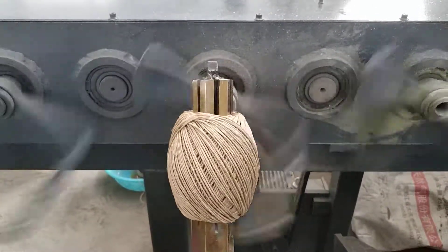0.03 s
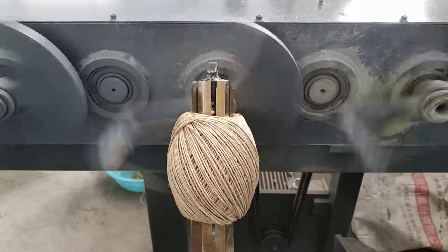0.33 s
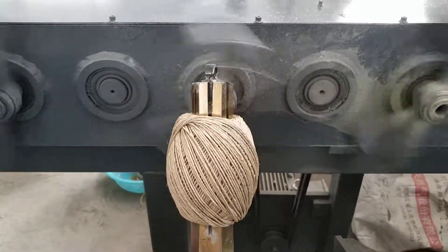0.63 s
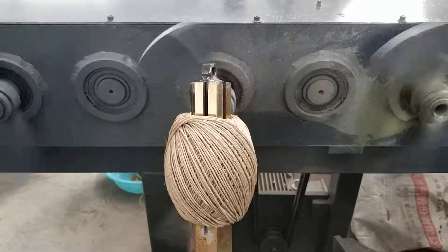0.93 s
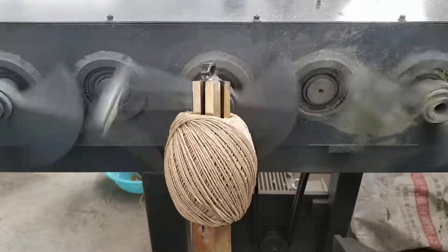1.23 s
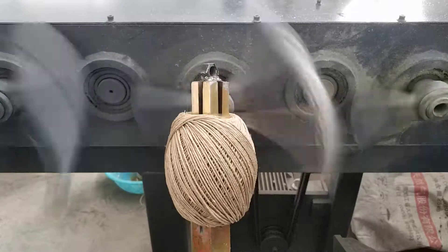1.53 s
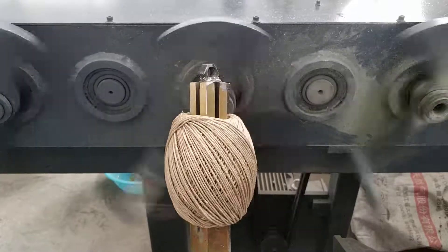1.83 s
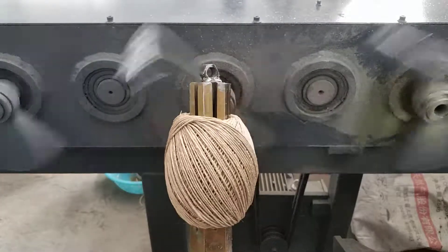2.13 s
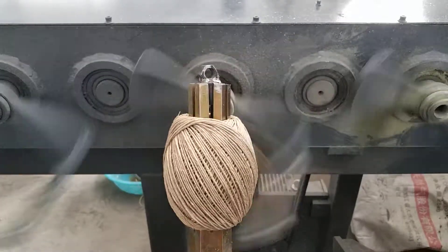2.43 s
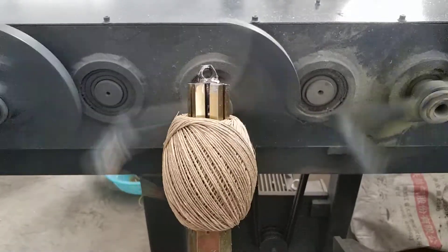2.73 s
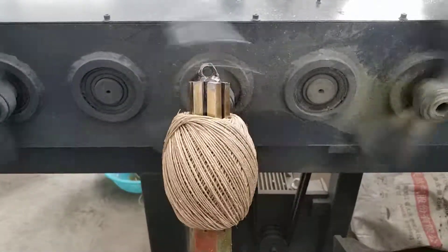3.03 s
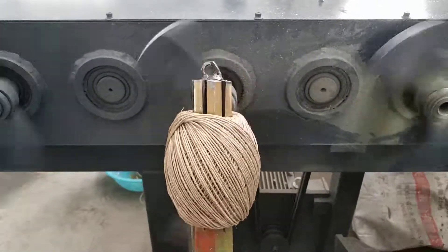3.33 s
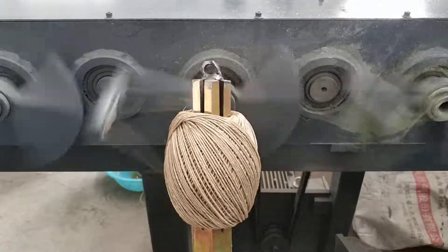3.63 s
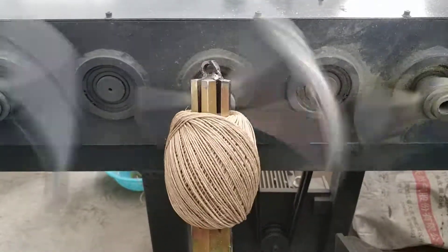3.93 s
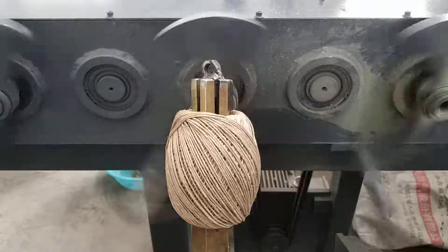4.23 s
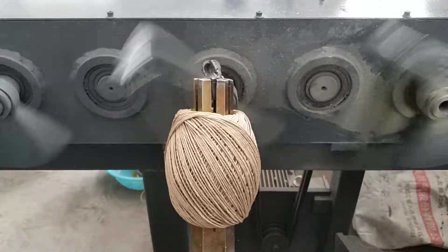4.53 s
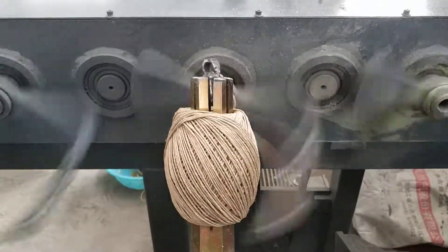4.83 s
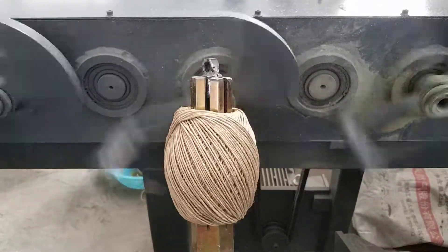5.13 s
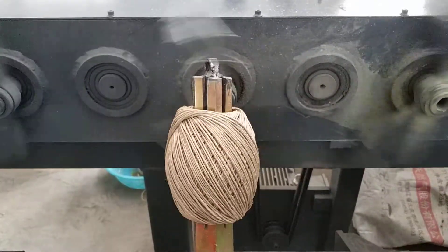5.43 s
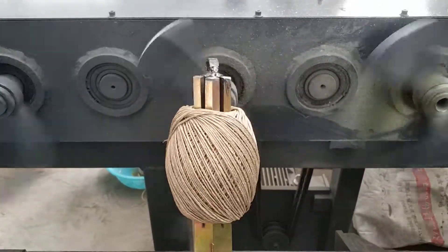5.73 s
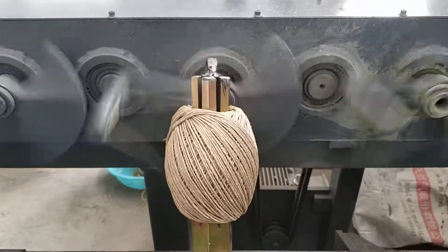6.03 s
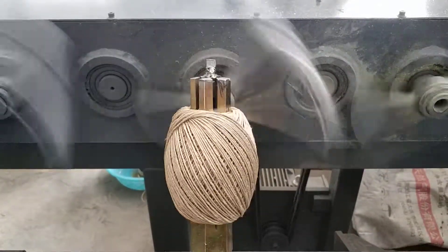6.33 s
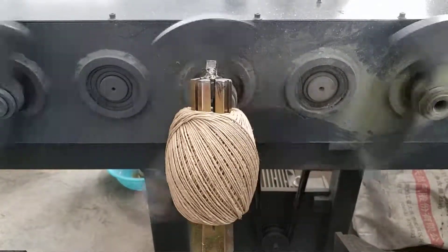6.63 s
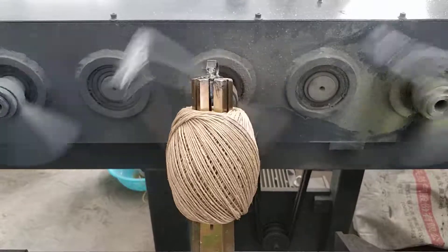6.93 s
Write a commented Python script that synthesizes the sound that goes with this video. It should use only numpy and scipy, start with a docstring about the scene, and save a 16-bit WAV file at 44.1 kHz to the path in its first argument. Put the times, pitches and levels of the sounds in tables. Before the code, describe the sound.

A yarn winding machine runs steadily for the whole seven seconds, heard close up in a workshop with only weak echo. The main sound is a dense midrange whir and chatter of loose gears ringing a steel frame, pulsing about eight times a second and slightly uneven in strength. Underneath, the drive drones and bumps. Small metal parts rattle with each turn, and the bearings add a fine hiss with a faint, thin high ring.

Slightly harder knocks and clacks are scattered throughout, for example around 0.5, 1.2, 3.2, 4.8 and 5.9 seconds. Dull thumps come at about 2.6 and 3.2 seconds, with a cluster between 6.4 and 6.9 seconds. The rattle and hiss dip very briefly near 2.8 and 6.9 seconds. The speed and overall loudness stay constant, and the machine is still running at the end.

```python
"""Yarn ball winder, close up

A workshop, one microphone close to a winder whose flyers turn about eight times a second. In every
turn loose gear teeth chatter and ring the steel frame, the drive bumps over its own drone and small
metal parts rattle; a slower belt loads gears and parts unevenly. Now and then a blow lands harder.
Behind it all, bearings hiss with a faint thin ring and the room answers weakly."""
import sys
import numpy as np
from scipy import signal
from scipy.fft import rfft, irfft, next_fast_len
from scipy.io import wavfile
from scipy.ndimage import uniform_filter1d, minimum_filter1d

SR = 44100
rng = np.random.default_rng(int(sys.argv[2]) if len(sys.argv) > 2 else 0)


def store_wav(level_fs):
    """Save 16-bit WAV to argv[1]."""
    pcm = np.round(np.clip(np.atleast_2d(level_fs), -1, 1) * 32767)
    wavfile.write(sys.argv[1], SR, pcm.T.astype(np.int16))


N = 312669
TIME = np.arange(N) / SR
FLYER_HZ, BELT_HZ, TEETH_PER_TURN = 7.915, 2.754, 52


# Teeth falling through their play in each turn: phase/turns, level/dB, length/s, hardness/dB
GEAR_CHATTER = [(.05, 6.5, 0.027, 0.5), (.33, 4, 0.02, -1), (.66, 6, .019, 2.1), (.79, 4, 0.017, 3.5)]
# Hardest knocks of the gears: t/s, level/dB, length/s, hardness/dB
GEAR_KNOCKS = [(0.094, 7, 0.053, -0.5), (0.141, 12.5, 0.013, 2.5), (0.259, 11.5, .019, -.5),
               (0.35, 9.5, 0.015, 4.5), (0.46, 13.5, 0.013, 0), (0.641, 8.5, 0.03, -1.5),
               (0.776, 8, 0.019, 6.5), (0.843, 5, .022, 6), (0.889, 9, 0.021, -3), (0.985, 8.5, 0.033, 1.5),
               (1.207, 7.5, 0.043, 0.5), (1.489, 11.5, 0.03, -2), (1.545, 5, 0.027, -2.5),
               (1.641, 9, 0.041, -1), (1.877, 8.5, .045, 0.5), (1.987, 8.5, 0.017, -1),
               (2.262, 10, 0.021, 1.5), (2.508, 8, 0.031, 4.5), (2.914, 9, .04, 1),
               (3.022, 10.5, 0.016, 1.5), (3.25, 13, 0.016, 2), (3.685, 8, 0.035, -1.5),
               (3.783, 10.5, 0.023, -0.5), (3.983, 7.5, 0.036, 4), (4.515, 8, .04, 1.5),
               (4.648, 8, .045, 1.5), (4.692, 13.5, 0.01, 4.5), (4.809, 15, .014, -2),
               (4.871, 9, 0.023, -4), (5.186, 12, 0.013, -1), (5.434, 9.5, 0.027, 0.5),
               (5.526, 11.5, 0.018, -5), (5.649, 11, 0.023, -0.5), (5.91, 13.5, .016, 5),
               (6.175, 10, .015, 2), (6.274, 8.5, .028, -0.5), (6.57, 9, 0.032, -0.5),
               (6.673, 15, 0.011, 0.5), (6.77, 11.5, 0.012, -3), (6.915, 12.5, .007, -3),
               (6.968, 11.5, .014, 0), (7.049, 10.5, 0.013, 1)]
# Broad response of the steel frame: f/Hz, level/dB
FRAME_RESPONSE = [(30, -69), (150, -38), (300, -17.5), (480, -3.5), (620, 2), (750, 0.5), (885, -6.5),
                  (970, 2.5), (1230, -1.5), (1350, -3.5), (1750, -1), (2300, -5), (2900, -11.5),
                  (10000, -39)]
# Ringing modes of the frame: f/Hz, width/Hz, lift/dB
FRAME_RESONANCES = [(540, 29.6, 10), (676.5, 27, 11.5), (767, 65, 7), (801.3, 26, 5), (848, 14, 7),
                    (1079, 28.4, 7.5), (1143, 16, 7.5), (1261, 75, 3), (1240, 25, 0), (1473, 30, 8.5),
                    (1608, 22, 10), (1637, 20, 8), (1942, 27, 8), (2430, 78, 4.5)]
def gears(spill=0.11):
    """Teeth and their rebounds ring the frame: soft bursts near 800 Hz, hard ones near 1200 Hz."""
    mesh = teeth(slop=.27, spread_db=1)
    rebounds = ticks(per_s=4500, spread_db=3.5)
    blows = .85 * mesh + .65 * rebounds
    bursts = every_turn(GEAR_CHATTER, GEAR_KNOCKS, scatter_s=.009, spread_db=3) + GEAR_KNOCKS
    # each burst's force beyond that of steady running
    soft = force([(s, db - hardness, length) for s, db, length, hardness in bursts], steady_db=-2) - 1
    hard = force([(s, db + hardness, length) for s, db, length, hardness in bursts], steady_db=-2) - 1
    knocks = band(blows * soft, 720, 950) + band(blows * hard, 950, 1340) + spill * blows * hard
    steady = blows + .3 * clinks(t60=.06, spread_db=10)
    loaded = (steady + knocks + panels(steady)) * belt(depth=.82)
    return amp(-15) * unit_rms(resonate(loaded, FRAME_RESPONSE, FRAME_RESONANCES))


def teeth(slop, spread_db):
    """One impact a tooth; the flyers' imbalance and the play in the gears shift each early or late."""
    turns = FLYER_HZ * TIME
    imbalance = .2 * np.sin(2 * np.pi * turns)
    teeth_passed = turns * TEETH_PER_TURN + imbalance + slop * drift(hz=20) + .02 * drift(hz=404)
    hits = np.diff(np.floor(np.maximum.accumulate(teeth_passed)), prepend=0) > 0
    return unit_rms(hits * amp(spread_db * np.clip(rng.standard_normal(N), -2, 2)))


# Panels of the frame: low f/Hz, high f/Hz, swing/dB, level/dB
FRAME_PANELS = [(450, 597, 5.5, 3.5), (1500, 1640, 5, -2), (1680, 2630, 3, -3)]
def panels(blows):
    """Each panel takes up the blows more or less strongly from moment to moment."""
    change = np.zeros(N)
    for low_hz, high_hz, swing_db, db in FRAME_PANELS:
        uptake = amp(db + swing_db * np.clip(drift(hz=20), -2, 1.7))
        change += band(blows * (uptake - 1), low_hz, high_hz)
    return change


# Load over one lap of the belt: phase/laps, level/dB at depth 1
BELT_LAP = [(.05, -0.25), (.25, 0.46), (.35, 0.5), (.45, 1.65), (.6, -1), (.7, 1.34), (.85, -1), (.95, 0.1)]
def belt(depth):
    """Gain from the belt's uneven load, the same in every lap."""
    return amp(depth * np.interp(BELT_HZ * TIME, *np.transpose(BELT_LAP), period=1))


# Bumps from the flyers' imbalance in each turn: phase/turns, level/dB, length/s
FLYER_BUMPS = [(.22, -2.5, 0.012), (.5, 1.5, 0.075)]
# Heaviest thumps of the drive: t/s, level/dB
DRIVE_THUMPS = [(.05, 4.5), (.392, 5.5), (1.076, 4), (1.541, 2.5), (2.64, 11), (2.988, 5), (3.187, 8.5),
                (4.469, 7), (5.239, 6.5), (6.399, 9), (6.51, 8), (6.61, 8.5), (6.888, 10)]
# Broad response of the stand: f/Hz, level/dB
STAND_RESPONSE = [(30, -75), (60, -50.5), (100, -35), (140, -20.5), (190, -5.5), (240, -7.5), (400, -1),
                  (480, -7.5), (620, -4.5), (900, -1.5), (2000, -13), (5000, -59.5)]
# Ringing modes of the stand: f/Hz, width/Hz, lift/dB (sign ignored)
STAND_RESONANCES = [(210.4, 13.3, 6), (240, 28, 11), (293, 34, 7), (367, 27, 8.5), (405, 7.3, -6)]
def drive(thump_s=.028):
    """Under the gears, the drive rumbles unevenly and bumps in the stand."""
    bumps = every_turn(FLYER_BUMPS, DRIVE_THUMPS, scatter_s=.019, spread_db=2.5)
    thumps = [(s, db, thump_s) for s, db in DRIVE_THUMPS]
    drone = ticks(per_s=1600, spread_db=1.5)
    blows = drone * force(bumps + thumps, steady_db=2.5) * amp(1.67 * drift(hz=22))
    return amp(-21.5) * unit_rms(resonate(blows, STAND_RESPONSE, STAND_RESONANCES))


# Broad response of the small parts: f/Hz, level/dB
PARTS_RESPONSE = [(200, -40.5), (1200, 7), (2200, -1.5), (2900, -6), (3700, 3.5), (4200, 1.5), (4700, -5),
                  (5200, -9), (7200, -22), (9500, -11), (10500, -31)]
# Ringing modes of the small parts: f/Hz, width/Hz, lift/dB
PARTS_RESONANCES = [(3225, 70, 2.5), (3475, 50, 3), (3940, 80, 4.5), (4625, 50, 2.5), (5475, 70, 4),
                    (5855, 45, 4)]
def loose_parts(shake):
    """Small metal parts buzz and clink as they are shaken."""
    grit = ticks(per_s=4000, spread_db=2.5) + .8 * clinks(t60=.07, spread_db=9)
    return amp(-24.5) * unit_rms(resonate(grit * shake, PARTS_RESPONSE, PARTS_RESONANCES))


# Shakes of the small parts in each turn: phase/turns, level/dB, length/s
PARTS_RATTLE = [(.19, -2.5, 0.017), (.35, 0, 0.027), (.69, -3, 0.032), (.99, -3, 0.029)]
# Loudest clacks of the small parts: t/s, level/dB, length/s
PARTS_CLACKS = [(0.176, 3, 0.065), (0.419, 5, 0.021), (0.868, 2.5, 0.034), (1.18, 9.5, 0.024),
                (2.319, 6.5, 0.032), (2.428, 4.5, .027), (2.693, 4.5, 0.038), (3.074, 6.5, .022),
                (3.45, 4.5, 0.035), (3.827, 4.5, 0.041), (4.086, 7, 0.018), (4.206, 7, 0.02),
                (4.463, 3.5, 0.022), (4.58, 4.5, 0.023), (4.961, 5.5, .022), (5.088, 6.5, .018),
                (5.161, 2.5, .02), (5.245, 3, 0.045), (5.606, 3.5, 0.034), (5.869, 3, 0.022),
                (5.985, 4, 0.032), (6.214, 3.5, .04), (6.333, 5.5, .034), (6.601, 3, .026),
                (6.735, 3.5, 0.015)]
def shaking():
    """Force on the small parts: pulsing in each turn, more when the belt pulls, most in a clack."""
    rattles = every_turn(PARTS_RATTLE, PARTS_CLACKS, scatter_s=.0058, spread_db=3)
    routine = force(rattles, steady_db=-6.5) * belt(depth=1.6)
    return np.hypot(routine, force(PARTS_CLACKS, steady_db=-21))


# Broad response of the bearings: f/Hz, level/dB
BEARING_RESPONSE = [(300, -40), (2000, 5.5), (3500, 5.5), (5200, -0.5), (6000, 2), (7200, -2), (8600, -1),
                    (9700, -4), (10150, -8.5), (10500, -24)]
# Thin ring of the bearings: f/Hz, relative level/dB
BEARING_TONES = [(7236, -59), (7595, -52.5), (7753, -53), (8030, -55.5), (8389, -61.5), (8461, -48.5),
                 (8678, -52)]
def bearings(shake, shake_share=.47, waver_db=.2):
    """Bearings give a fine gritty hiss that swells with each rattle, and thin wavering tones."""
    swell = unit_rms(shake ** shake_share * amp(waver_db * drift(hz=10)))
    grit = ticks(per_s=7000, spread_db=3.5) + .75 * clinks(t60=.07, spread_db=10)
    hiss = unit_rms(resonate(grit, BEARING_RESPONSE))
    tones = sum(amp(db + 2.5 * drift(hz=7)) * np.sin(2 * np.pi * hz * TIME + .7 * drift(hz=4))
                for hz, db in BEARING_TONES)
    return amp(-29) * swell * hiss + amp(4) * tones


# Slow swell of rattle and hiss: t/s, level/dB
TREBLE_SWELL = [(0, 0.5), (.7, -1.2), (2, -0.2), (3.6, 0.86), (5.2, 0.44), (6.2, .3), (7.09, 0.8)]
# Brief lulls in rattle and hiss: t/s, level/dB, length/s
TREBLE_LULLS = [(2.12, -4, 0.021), (2.847, -6, 0.058), (3.933, -3, 0.061), (6.523, -3, 0.028),
                (6.87, -4, 0.11)]
def treble():
    """Gain of rattle and hiss together: they swell slightly and now and then dip briefly."""
    dips = sum(db * bell(TIME - s, length) for s, db, length in TREBLE_LULLS)
    return amp(np.interp(TIME, *np.transpose(TREBLE_SWELL)) + dips)


def workshop(x, t60=.17, wet_db=-17):
    """Dense reflections from the walls and the other machines, weak this close to the winder."""
    t = TIME[:SR // 2]
    tail = rng.standard_normal(len(t)) * amp(-60 * t / t60) * (t > .005)
    return x + amp(wet_db) * signal.oaconvolve(x, tail / np.linalg.norm(tail))[:N]


def every_turn(pattern, accents, scatter_s, spread_db, clear_s=.028):
    """Repeats bursts each flyer turn, uneven in time and strength, leaving gaps for the accents."""
    turns = range(int(TIME[-1] * FLYER_HZ) + 1)
    bursts = np.array([((turn + phase) / FLYER_HZ, *rest) for turn in turns for phase, *rest in pattern])
    late, strong = np.clip(rng.standard_normal((len(bursts), 2)), -2, 1.2).T
    bursts[:, 0] += scatter_s * late
    bursts[:, 1] += spread_db * strong
    return [burst for burst in bursts if min(abs(burst[0] - s) for s, *_ in accents) > clear_s]


def force(bursts, steady_db):
    """Strength of contact: a steady part plus bursts (t/s, level/dB, length/s), added in power."""
    power = np.full(N, amp(steady_db) ** 2)
    for s, db, length in bursts:
        near = slice(*np.searchsorted(TIME, [s - 2 * length, s + 2 * length]))
        power[near] += amp(db) ** 2 * bell(TIME[near] - s, length)
    return np.sqrt(power)


def ticks(per_s, spread_db):
    """Tiny impacts at random moments, of random sign and size."""
    hits = rng.random(N) < per_s / SR
    size = amp(spread_db * np.clip(rng.standard_normal(N), -2, 2))
    return unit_rms(hits * size * rng.choice([-1, 1], N))


def clinks(t60, spread_db, count=6500):
    """Many small pieces of metal, struck at random, each ringing briefly at its own pitch."""
    t = TIME[:SR // 20]
    out, decay = np.zeros(N + len(t)), amp(-60 * t / t60)
    for when, pitch, size in rng.random((count, 3)):
        at, hz = int(when * N), 1500 + 9000 * pitch
        out[at:at + len(t)] += amp(spread_db * size) * decay * np.sin(2 * np.pi * hz * t)
    return unit_rms(out[:N])


def resonate(x, broad, modes=(), size=8192):
    """Passes x through a body with a broad response and modes that ring on after each blow."""
    hz = np.fft.rfftfreq(size, 1 / SR)
    broad_hz, broad_db = np.transpose(broad)
    gain = amp(np.interp(np.log(hz + 1), np.log(broad_hz), broad_db))
    power_lift = 1
    for centre, width, db in modes:
        detuning = 2 * (hz - centre) / (width * np.pi / 2)
        power_lift += (amp(abs(db)) ** 2 - 1) / (1 + detuning ** 2) ** 2
    log_gain = np.log(gain * np.sqrt(power_lift))
    mirrored = np.concatenate([log_gain, log_gain[-2:0:-1]])
    spectrum = np.exp(np.conj(signal.hilbert(mirrored)))  # minimum phase: no sound before the blow
    return signal.oaconvolve(x, np.fft.ifft(spectrum).real[:size // 2])[:N]


def drift(hz, step=16):
    """Smooth random wander of rms 1, rolling off above hz."""
    size = next_fast_len(N // step + 2)
    f = np.fft.rfftfreq(size, step / SR)
    slow = irfft(rfft(rng.standard_normal(size)) / (1 + (f / hz) ** 4), size)
    return unit_rms(np.interp(np.arange(N) / step, np.arange(size), slow))


def band(x, low_hz, high_hz):
    """Keeps one band without delaying it."""
    return signal.sosfiltfilt(signal.butter(3, [low_hz, high_hz], "band", fs=SR, output="sos"), x)


def bell(t, width):
    """Bell curve with the given width at half height."""
    return .5 ** ((2 * t / width) ** 2)


def amp(db):
    """Decibels to gain."""
    return 10 ** (np.asarray(db) / 20)


def unit_rms(x):
    """Scales to rms 1."""
    return x / np.sqrt(np.mean(x ** 2) + 1e-20)


def scene():
    """The whole winder in its room, from one close position."""
    shake = shaking()
    winder = gears() + drive() + treble() * (loose_parts(shake) + bearings(shake))
    return workshop(winder)[None]


def record(dry, ceiling=.95, edge_hz=10550):
    """After the microphone, a quick limiter holds peaks under full scale; a low-pass follows."""
    needed_gain = np.minimum(1, ceiling / (abs(dry) + 1e-9))
    held_gain = minimum_filter1d(needed_gain, size=801)
    gain = uniform_filter1d(uniform_filter1d(held_gain, size=401), size=401)
    low_pass = signal.firwin(511, edge_hz, window=("kaiser", 9), fs=SR)
    return signal.oaconvolve(dry * gain, low_pass[None], "same")


dry = scene()
out = record(dry)
store_wav(out)
```